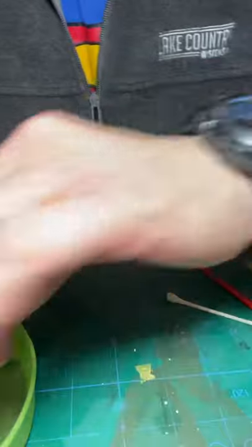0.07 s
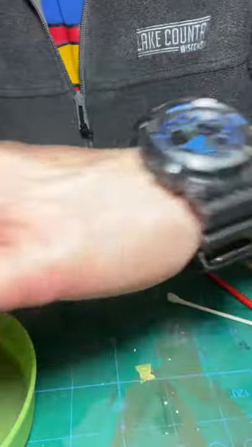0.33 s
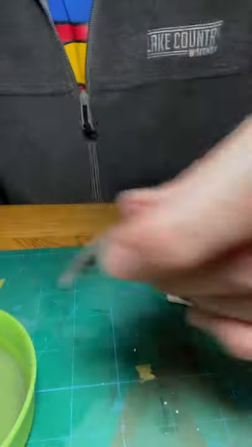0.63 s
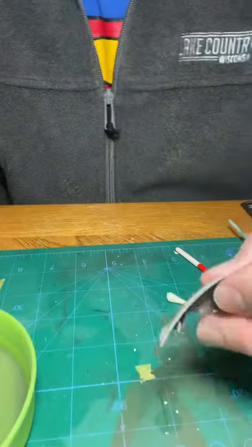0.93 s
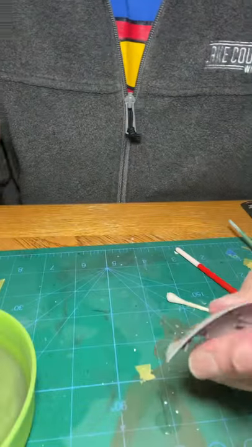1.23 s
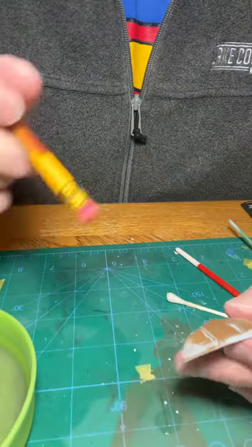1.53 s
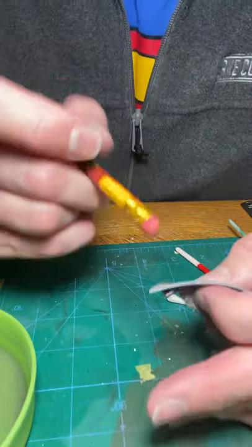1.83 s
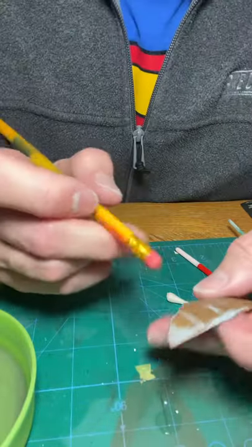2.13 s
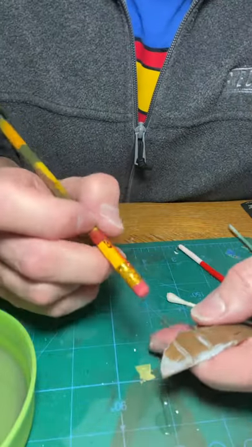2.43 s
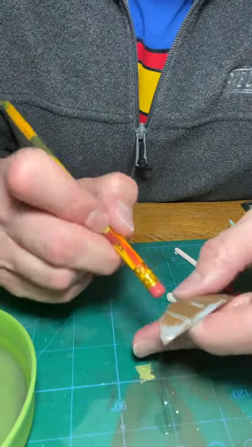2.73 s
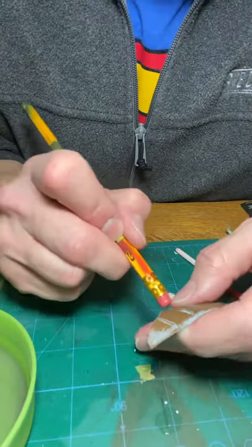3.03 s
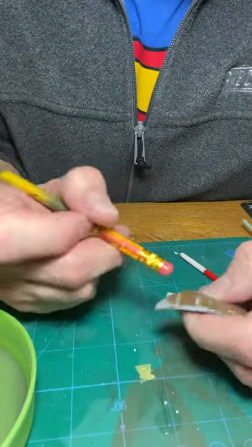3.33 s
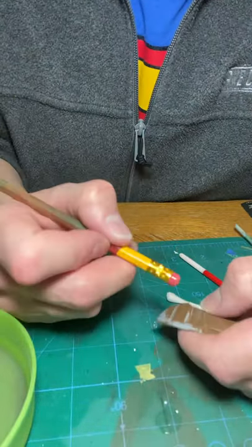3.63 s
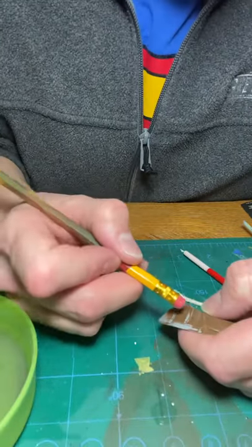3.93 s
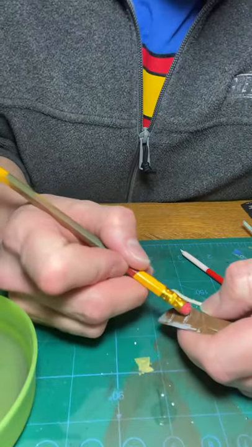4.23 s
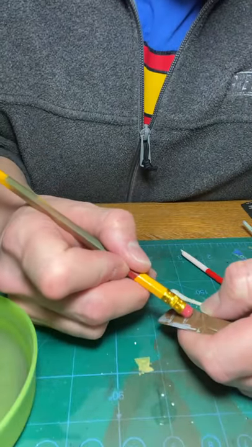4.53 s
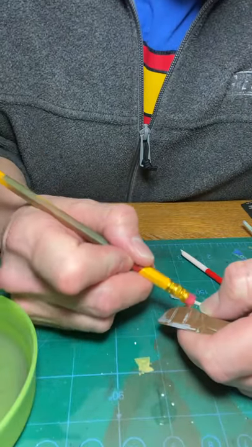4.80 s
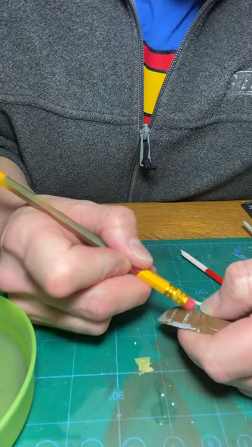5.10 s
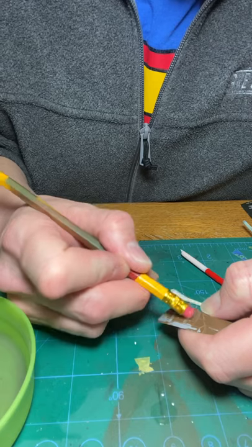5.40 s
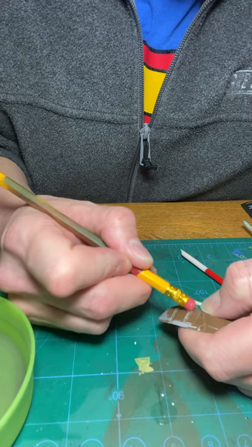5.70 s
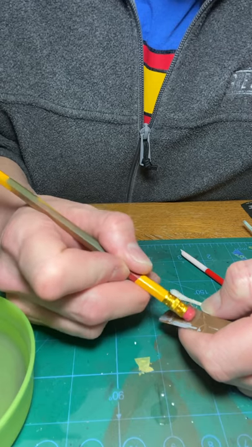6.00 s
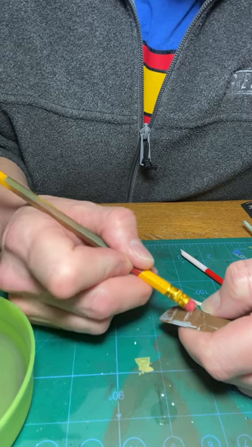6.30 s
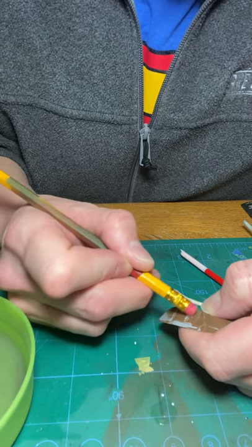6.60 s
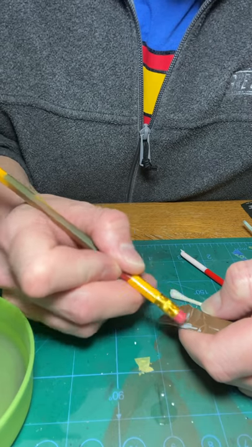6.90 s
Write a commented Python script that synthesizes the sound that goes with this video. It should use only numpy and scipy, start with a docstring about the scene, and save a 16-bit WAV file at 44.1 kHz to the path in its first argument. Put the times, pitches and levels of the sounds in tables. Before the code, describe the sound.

Hands bump and scuff a table with small plastic clicks and sleeve rustle, then a pencil eraser faintly rubs a plastic part.

```python
"""A work table in a quiet, humming room, heard close from a stereo microphone pair standing on the table.
Someone takes up a small painted plastic part and a pencil: fleece sleeves swish, hands bump the top
and skid on the mat, small things click, knock and scrape. Then light, quick eraser strokes rub the part.
Rustle and rubbing cross the air to the microphones; every bump comes through the table and booms."""
import sys
import numpy as np
from scipy import signal
from scipy.fft import rfft, irfft
from scipy.io import wavfile

SR = 44100
rng = np.random.default_rng(int(sys.argv[2]) if len(sys.argv) > 2 else 0)


def put_to_file(sound):
    """Save the sound as 16-bit audio at rate SR, in the file named by the first command-line argument."""
    columns = np.atleast_2d(sound).T  # one column per channel
    safe = np.clip(columns, -1, 1)
    whole_steps = np.round(safe * 32767)
    wavfile.write(sys.argv[1], SR, whole_steps.astype(np.int16))


N = 306493
TIME = np.arange(N) / SR
BIN_HZ = np.fft.rfftfreq(N, 1 / SR)


def gain_of(db):
    """Decibels to amplitude."""
    return 10 ** (np.asarray(db) / 20)


def unit_rms(x):
    """Scales to rms 1."""
    return x / np.sqrt(np.mean(x ** 2) + 1e-30)


def curve_at(points, hz, column=1):
    """One column of a table, interpolated along log frequency."""
    table = np.array(points, float)
    return np.interp(np.log(hz + 1), np.log(table[:, 0] + 1), table[:, column])


def add(mix, start_s, sound):
    """Adds a sound to the mix at start_s."""
    part = mix[max(round(start_s * SR), 0):][:len(sound)]
    part += sound[:len(part)]


def coloured(x, spectrum, centre_hz=1000, focus_db=0, focus_octaves=0.11):
    """Gives x a spectrum, lifted around centre_hz; rms 1."""
    hz = np.fft.rfftfreq(len(x), 1 / SR)
    lift_db = focus_db * np.exp(-(np.log2((hz + 1) / centre_hz) / focus_octaves) ** 2)
    return unit_rms(irfft(rfft(x) * gain_of(curve_at(spectrum, hz) + lift_db), len(x)))


def drift(rate_hz):
    """A smooth random wander of rms 1."""
    return unit_rms(irfft(rfft(rng.standard_normal(N)) * np.exp(-(BIN_HZ / rate_hz) ** 2), N))


def grains(per_s, spread_db):
    """Friction: a crowd of tiny catches, a few of them large."""
    size = gain_of(spread_db * np.minimum(rng.exponential(1, N), 5))
    return unit_rms(size * rng.standard_normal(N) * (rng.random(N) < per_s / SR))


def patchy(x, depth_db, width_bins=6.0, length_frames=46.0):
    """Shifts the colour of a noise by chance, as when a rubbing contact moves; rms 1."""
    frames = signal.stft(x, nperseg=256, noverlap=192)[2]
    steps = np.arange(-40, 41)
    across, along = (np.exp(-.5 * (steps / spread) ** 2) for spread in (width_bins / 2, length_frames))
    patches = signal.fftconvolve(rng.standard_normal(frames.shape), np.outer(across, along), "same")
    frames *= gain_of(depth_db * unit_rms(patches))
    return unit_rms(signal.istft(frames, nperseg=256, noverlap=192)[1][:N])


def ringing(modes, t, weights=1):
    """Dying modes, each starting at a random phase."""
    hz, db, t60 = np.transpose(modes)
    turns = hz * t[:, None] + rng.random(len(hz))
    waves = gain_of(db - 60 * t[:, None] / t60) * np.sin(2 * np.pi * turns)
    return (waves * weights).sum(1)


def resonant(x, peaks, plain=0):
    """Passes x through resonances, beside a plain share; rms 1."""
    response = plain + sum(gain_of(db) / (1 + 2j * (BIN_HZ - hz) / width) for hz, width, db in peaks)
    return unit_rms(irfft(rfft(x) * response, N))


# Paths to the microphones: across the air, through the table under them, off the mat in front of them
# (f/Hz, lead of the left side/rad, level of the right side/dB)
AIR_PATH = [(60, 0, -1), (140, 0, 2), (230, -.8, 4), (370, -2.4, 1.5), (600, -3.6, .5), (1300, -3.3, 0),
            (3500, -3.45, 0), (4300, -5.1, -1), (5200, -6.2, -1), (7500, -6.3, -1), (10000, -7.7, 0),
            (12700, -9.2, 0)]
TABLE_PATH = [(60, .1, -3), (130, .3, -9), (220, 1.3, -7), (350, 2.4, -2), (650, 2.5, 0), (1300, 2.9, 0)]
MAT_PATH = [(200, -.8, 2), (480, -2.5, 0), (700, -1.9, 0), (1240, -1.9, 0), (1950, -2.8, 0),
            (2700, -3.8, 0), (4300, -4.9, -1), (5200, -6.2, -1), (7500, -6.3, -1), (12700, -9.2, 0)]
def microphone_pair(x, path, fade_s=0.005):
    """Left and right as the microphones hear x along a path, faded at both ends."""
    left = x * np.minimum(np.minimum(TIME, TIME[::-1]) / fade_s, 1)
    right_gain = gain_of(curve_at(path, BIN_HZ, column=2))
    right_lag = np.exp(-1j * curve_at(path, BIN_HZ))
    return np.array([left, irfft(rfft(left) * right_gain * right_lag, N)])


# Room air all around the table (f/Hz, level/dB per Hz)
AIR_SPECTRUM = [(20, -36), (50, 4.5), (90, -8), (200, -8.5), (330, -12), (450, -15.5), (900, -26.5),
                (1800, -37.5), (2600, -45.5), (4000, -46.5), (6500, -51.5), (10000, -56.5), (12300, -54),
                (13000, -64.5), (15000, -67.5)]
# An appliance in the background (f/Hz, level/dB, level of the right side/dB, lead of the left side/rad)
APPLIANCE_HUM = [(59.74, -58.5, 0, 1), (140, -68.5, 2.5, 1.5), (360.5, -65.5, 2, -2), (591.4, -79, 1, 4.5),
                 (952, -88.5, -2.5, 5.5)]
def room_tone(air_db=-55, diffuse_db=-64, waver=0.23):
    """Air noise, partly from one side and partly diffuse, and an appliance's slightly wavering hum."""
    air = patchy(coloured(rng.standard_normal(N), AIR_SPECTRUM), depth_db=-0.4, width_bins=6.4)
    out = gain_of(air_db) * microphone_pair(air, AIR_PATH)
    diffuse = np.array([coloured(side, AIR_SPECTRUM) for side in rng.standard_normal((2, N))])
    out += gain_of(diffuse_db) * diffuse
    for hz, db, right_db, lead in APPLIANCE_HUM:
        phase = 2 * np.pi * hz * TIME + 2 * waver * drift(rate_hz=1.8)
        pair = np.array([np.sin(phase), gain_of(right_db) * np.sin(phase - lead)])
        out += np.sqrt(2) * gain_of(db) * (1 + waver * drift(rate_hz=36.0)) * pair
    return out


# Modes of the table top, right under the microphones (f/Hz, level/dB, t60/s)
TABLE_MODES = [(49, -23.5, 0.25), (59.6, -3.5, 0.3), (85.4, -2, 0.45), (126.3, 0, 0.23), (138.04, -8, 0.74),
               (161.8, 1.5, 0.12), (197, -6, 0.28), (201.6, 5, 0.078), (238.8, -2, 0.16),
               (278.3, -8, 0.079), (337.8, -5, 0.17), (483.5, -9.5, 0.15), (678, -15, 0.11),
               (700, -17.5, 0.029)]
def table_top(force, damping):
    """The top rings in answer to a force; damping above 1 shortens the ring, as a hand on it does."""
    t = TIME[:SR // 2]
    response = sum((-1) ** k * gain_of(db - 60 * t * damping / t60) * np.sin(2 * np.pi * hz * t)
                   for k, (hz, db, t60) in enumerate(TABLE_MODES))
    return signal.fftconvolve(force, response)[:N]


# Rumble of hands resting on the same table as the microphones (t/s, level/dB before contrast)
HAND_WEIGHT = [(0.0, -44), (0.87, -55.5), (1.6, -61.5), (1.8, -47.5), (2.15, -50), (2.92, -45),
               (3.08, -47.5), (3.58, -47.5), (3.72, -35.5), (3.87, -50), (4.82, -58), (4.95, -49.5),
               (5.87, -60.5), (6.15, -50), (6.44, -59), (6.95, -47.5)]
def leaning_hands(contrast=1.37, usual_db=-48):
    """Resting hands shift and nudge the table at random, the more so the harder they lean."""
    nudge_spectrum = [(20, -6), (50, 3), (100, 4), (200, -0.5), (400, 1), (800, -11.5)]
    force = coloured(grains(per_s=160, spread_db=2.0), nudge_spectrum)
    weight_db = np.interp(TIME, *np.transpose(HAND_WEIGHT))
    rumble = unit_rms(table_top(force, damping=0.89))
    return rumble * gain_of(usual_db + contrast * (weight_db - usual_db))


# Modes of the part and the fingers holding it over the mat (f/Hz, level/dB, t60/s)
HELD_MODES = [(354, 1.5, 0.098), (455, -6, 0.14), (483, 4.5, 0.071), (626, -4, 0.09), (740, -19, 0.088),
              (1015, -10, 0.067), (1220, 3, 0.077), (1397, 2.5, 0.038), (1655, 5.5, 0.03),
              (1901, 3.5, 0.045), (2390, -6, 0.012)]
def fidgeting_fingers(level_db=-77, restless_db=7):
    """Fingertips keep creeping on the part: faint, irregular little rubs."""
    creep_spectrum = [(200, -10), (450, -1.5), (1300, -3.5), (2300, -17), (4000, -33)]
    force = coloured(grains(per_s=170, spread_db=1.5), creep_spectrum)
    force *= gain_of(restless_db * np.tanh(drift(rate_hz=26)))
    rubs = signal.fftconvolve(force, ringing(HELD_MODES, TIME[:SR // 8]))[:N]
    return gain_of(level_db) * unit_rms(rubs)


# Hands and forearms land on the table and boom up into the microphones
# (t/s, level/dB, f/Hz driven most, heft in the lowest modes/dB)
ARM_BUMPS = [(0.002, -42.5, 143, -12), (0.598, -40, 165, -14), (1.069, -34, 247, -19),
             (1.084, -34.5, 237, -12.5), (1.166, -47, 67, -12), (1.587, -40, 154, -12),
             (1.896, -41, 56.4, -20), (1.933, -39.5, 62, -10), (1.944, -45, 216, -34),
             (3.309, -34, 168, -8), (3.359, -35, 179, -5), (3.385, -35.5, 123, -16),
             (3.549, -32, 108.5, -14), (3.578, -41, 104, -26), (4.057, -39, 135, -3.5),
             (4.847, -34.5, 166, -24), (5.117, -41.5, 222, -34), (5.516, -45, 182, -14),
             (6.175, -40.5, 117, -9), (6.859, -43.5, 174, -22)]
def arm_bumps(reach_octaves=0.56, rise_s=0.0032):
    """Soft flesh drives the table modes near one pitch, and a heavy arm the lowest ones too."""
    out, t = np.zeros(N), TIME[:SR // 2]
    mode_hz = np.array(TABLE_MODES)[:, 0]
    for start_s, db, hz, heft_db in ARM_BUMPS:
        near_pitch = 1 / (1 + (np.log2(mode_hz / hz) / reach_octaves) ** 2)
        heft = gain_of(heft_db) * (mode_hz < 100)
        boom = ringing(TABLE_MODES, t, near_pitch + heft) * (1 - np.exp(-(t / rise_s) ** 2))
        add(out, start_s, gain_of(db) * boom / boom[:SR // 20].std())
    return out


# Modes of the plastic part (f/Hz, level/dB, t60/s)
PLASTIC_MODES = [(738, 5, 0.16), (1156, 2, 0.036), (2010, -24, 0.03), (4400, -6, 0.03),
                 (5780, -22.5, 0.025), (6600, -0.5, 0.012)]
# Pencil, fingernails and part click just in front of the microphones
# (t/s, level/dB, centre f/Hz, span to either side/octaves, crack decay/s, ring/dB)
SMALL_CLICKS = [(0.236, -71, 6900, 0.28, 0.002, -30), (0.4742, -54, 7340, 1.6, 0.0016, -28),
                (0.7733, -66, 5400, 0.2, 0.0017, -30), (1.064, -54, 4160, 0.41, 0.0012, -26),
                (2, -51, 5640, 0.69, 0.0039, -42), (2.1161, -59, 6950, 0.35, 0.0009, -26),
                (2.152, -59.5, 6700, 0.59, 0.002, -34), (2.7736, -77, 6100, 0.26, 0.0027, -27),
                (3.003, -58.5, 5500, 0.4, 0.0037, -13), (3.088, -60, 5100, 0.37, 0.0019, -26),
                (3.159, -57.5, 7140, 0.43, .0012, -16), (3.2969, -48, 3400, 0.95, 0.0014, -8),
                (3.5677, -49, 5300, 0.48, 0.0032, 3.5), (3.6624, -51, 3260, 1.02, 0.003, -29),
                (3.7, -54.5, 5040, 0.43, .006, -23), (4.844, -78, 5000, 0.64, .003, -21)]
def small_clicks(rise_s=0.00054, snap_db=-13, snap_decay_s=0.0012):
    """A short crack, thin or full by what touches, with a bright snap on top; then the plastic rings."""
    out, t = np.zeros(N), TIME[:SR // 8]
    bright = signal.butter(2, 9000, "highpass", fs=SR)
    rise = 1 - np.exp(-t / rise_s)
    for start_s, db, hz, octaves, crack_s, ring_db in SMALL_CLICKS:
        band = signal.butter(2, [hz / 2 ** octaves, min(hz * 2 ** octaves, 12000)], "bandpass", fs=SR)
        crack = signal.lfilter(*band, rng.standard_normal(len(t)) * np.exp(-t / crack_s) * rise)
        crack /= crack[:SR // 170].std()
        snap = signal.lfilter(*bright, rng.standard_normal(len(t)) * np.exp(-t / snap_decay_s))
        ring = rise * ringing(PLASTIC_MODES, t)
        add(out, start_s, gain_of(db) * (crack + gain_of(snap_db) * snap + gain_of(ring_db) * ring))
    return out


# Hiss of fleece at close range (f/Hz, level/dB per Hz)
FLEECE_SPECTRUM = [(200, -7), (500, 6.5), (1100, 16), (2000, 10), (2800, -4), (4200, 2), (5500, 4.5),
                   (7000, 3.5), (8500, -10), (10500, -12.5), (12200, -15.5), (13200, -23), (15000, -40)]
# Sleeves slide near the microphones (t/s, length/s, level/dB before trim, sheen/dB before lift)
SLEEVE_SLIDES = [(0.41, 0.22, -67, -4), (0.592, 0.2, -62, -8.5), (0.818, 0.29, -68.5, -10.5),
                 (1.218, 0.16, -69.5, 0), (1.338, 0.19, -68.5, 8.5), (1.45, 0.42, -65.5, 1),
                 (1.86, 0.05, -61.5, -8), (1.958, 0.0098, -54, -1.5), (2.082, 0.078, -65, -1),
                 (2.216, 0.49, -72, -6), (2.489, 0.17, -62.5, -7.5), (3.117, 0.43, -62, 2.5),
                 (3.703, 0.084, -57.5, -25)]
def sleeves(trim_db=-2, flutter_db=0.93, sheen_lift_db=10, crinkle_db=-8, attack_s=0.069, fall_s=0.035):
    """Slides swell, hold and fade as fibres catch and let go; some are bright with sheen, others dull."""
    fibres = rng.standard_normal(N) + gain_of(crinkle_db) * grains(per_s=900, spread_db=2.6)
    hiss = patchy(coloured(fibres, FLEECE_SPECTRUM), depth_db=2.8, length_frames=12.0)
    treble = signal.sosfiltfilt(signal.butter(3, 8200, "highpass", fs=SR, output="sos"), hiss)
    speed, sheen = np.zeros(N), np.zeros(N)
    for start_s, length_s, db, sheen_db in SLEEVE_SLIDES:
        t = TIME - start_s
        slide = gain_of(db) * np.exp(np.minimum(t / attack_s, 0) - np.maximum((t - length_s) / fall_s, 0))
        speed = np.maximum(speed, slide)
        sheen = np.maximum(sheen, slide * gain_of(sheen_db + sheen_lift_db))
    flutter = gain_of(trim_db + flutter_db * drift(rate_hz=360))
    return flutter * (speed * (hiss - treble) + sheen * treble)


# Bands in the hiss of an arm passing the microphones
# (f/Hz, width/Hz, level/dB, loudest at t/s, half-length/s, rise/octaves per s)
SWEEP_BANDS = [(2315, 190, -61, 0.685, 0.064, 0.1), (3770, 300, -67.5, 0.68, 0.079, 0.7),
               (5020, 230, -73, 0.73, 0.05, 0.17), (6100, 500, -72.5, 0.7, 0.037, .3),
               (5120, 320, -72.5, 0.885, 0.033, 0.11), (7350, 1100, -70.5, .42, 0.014, .5),
               (6700, 760, -74.5, 1.48, 0.076, 0.296)]
def sleeve_whistle():
    """As an arm sweeps past, its hiss rings in a few narrow bands that rise a little."""
    out, t = np.zeros(N), TIME[:SR * 3 // 4] - 3 / 8
    for hz, width, db, peak_s, half_s, rise in SWEEP_BANDS:
        narrow = signal.butter(2, width / 2, fs=SR, output="sos")
        cos_noise, sin_noise = signal.sosfilt(narrow, rng.standard_normal((2, len(t))))
        phase = 2 * np.pi * np.cumsum(hz * 2 ** (rise * t)) / SR
        band = unit_rms(cos_noise * np.cos(phase) + sin_noise * np.sin(phase))
        add(out, peak_s + t[0], gain_of(db) * band * np.exp(-.5 * (t / half_s) ** 2))
    return out


# The puff of friction in a knock (f/Hz, level/dB per Hz)
PUFF_SPECTRUM = [(250, -20.5), (450, 15.5), (2000, -7.5), (2900, -12), (6000, -34.5)]
# Part, pencil and eraser knock in the fingers, over the mat (t/s, level/dB, f/Hz driven most)
DULL_KNOCKS = [(1.066, -68, 1430), (1.073, -51.5, 463), (1.586, -52.5, 450), (2.002, -63.5, 1740),
               (2.503, -52.5, 2050), (3.299, -49, 1860), (3.36, -47, 430), (3.571, -52, 745),
               (3.572, -58.5, 1250), (3.66, -55.5, 1620), (4.055, -50.5, 400), (4.057, -57.5, 640),
               (4.324, -59, 484), (4.849, -72, 1510)]
def dull_knocks(reach_octaves=0.17, puff_db=-7, puff_decay_s=0.011, rise_s=0.0017):
    """The held part rings briefly near one pitch, damped by the fingers, with a puff of friction."""
    out, t = np.zeros(N), TIME[:SR // 4]
    mode_hz = np.array(HELD_MODES)[:, 0]
    for start_s, db, hz in DULL_KNOCKS:
        near_pitch = 1 / (1 + (np.log2(mode_hz / hz) / reach_octaves) ** 2)
        ring = unit_rms(ringing(HELD_MODES, t, near_pitch))
        noise = coloured(rng.standard_normal(len(t)), PUFF_SPECTRUM, hz, focus_db=13, focus_octaves=0.34)
        puff = unit_rms(noise * np.exp(-t / puff_decay_s))
        knock = (ring + gain_of(puff_db) * puff) * (1 - np.exp(-t / rise_s))
        add(out, start_s, gain_of(db) * knock / knock[:SR // 33].std())
    return out


# Rubber and fingertips chirp and creak close by (t/s, level/dB, half-length/s, f/Hz)
PAINT_SQUEAKS = [(1.79, -52.5, 0.1, 467), (2.945, -41.5, 0.006, 456), (3.733, -45.5, 0.014, 693),
                 (4.326, -46, 0.0064, 457), (5.341, -73.5, 0.011, 3810), (5.346, -47.5, 0.0062, 513),
                 (6.175, -43.5, 0.005, 470)]
def paint_squeaks(width_share=0.055):
    """Fast stick-slip on the paint gives brief, fuzzy tones."""
    out, t = np.zeros(N), TIME[:SR] - .5
    for peak_s, db, half_s, hz in PAINT_SQUEAKS:
        edges_hz = [hz * (1 - width_share), hz * (1 + width_share)]
        band = signal.butter(2, edges_hz, "bandpass", fs=SR, output="sos")
        tone = unit_rms(signal.sosfilt(band, rng.standard_normal(SR)))
        add(out, peak_s + t[0], gain_of(db) * tone * np.exp(-.5 * (t / half_s) ** 2))
    return out


# Skin dragging on the mat (f/Hz, level/dB per Hz)
GRIT_SPECTRUM = [(200, -21), (400, 0), (700, -5.5), (950, -5), (1600, -1.5), (2200, -13), (2900, -28),
                 (3700, -15.5), (6500, -32.5), (9000, -29), (12000, -34), (14500, -90)]
# Resonances that the dragging hand wakes (f/Hz, width/Hz, level/dB)
RASP_PEAKS = [(297, 20, 13), (498, 52, 6), (696, 9.8, 5.5), (1265, 36, -5.5), (1977, 78, -0.5),
              (2185, 55, -2.5)]
# A hand skids in front of the microphones (t/s, half-length/s, slip rate/Hz, judder/dB, grit/dB)
HAND_SCUFFS = [(2.391, 0.03, 200, -47, -58), (2.51, 0.0056, 223, -31.5, -52),
               (2.985, 0.13, 193, -47, -63.5), (3.023, 0.013, 189.4, -21.5, -54),
               (3.705, 0.012, 170, -28.5, -45), (3.737, 0.016, 205, -19.5, -40.5),
               (3.787, 0.031, 227, -33.5, -49.5)]
def hand_scuffs(jitter=0.06, squareness=2.4):
    """Skin sticks and slips: each slip kicks the table and sheds a puff of grit; returns the two apart."""
    judder, grit_level = np.zeros(N), np.zeros(N)
    unsteady, catches = drift(rate_hz=300), grains(per_s=3500, spread_db=2.4)
    t = TIME[:SR] - .5
    low_cut = signal.butter(2, 100, "highpass", fs=SR)
    for peak_s, half_s, slip_hz, judder_db, grit_db in HAND_SCUFFS:
        pressure = np.exp(-.5 * abs(t / half_s) ** squareness)
        slips = np.cumsum(slip_hz * (1 + jitter * unsteady[round(peak_s * SR):][:SR])) / SR
        kicks = np.diff(np.floor(slips), prepend=0) * pressure
        shake = signal.lfilter(*low_cut, table_top(kicks, damping=1.28))
        add(judder, peak_s + t[0], gain_of(judder_db) * shake / (abs(shake).max() + 1e-12))
        puffs = unit_rms(1 + np.exp(-(slips % 1)))
        add(grit_level, peak_s + t[0], gain_of(grit_db) * pressure * puffs)
    return judder, grit_level * resonant(coloured(catches, GRIT_SPECTRUM), RASP_PEAKS, plain=0.27)


# Resonances of the gripped part (f/Hz, width/Hz, level/dB)
GRIP_PEAKS = [(798, 34, -5), (1246, 39, 7.5), (1290, 17, -25), (1944, 37, -1.5), (2820, 45, -23),
              (3450, 52, -30), (4190, 144, -7), (5100, 300, -19.5), (5840, 740, -14.5), (6440, 230, -28)]
# The part scrapes as it is gripped, over the mat (t/s, length/s, level/dB, extra treble/dB)
GRIP_SCRAPES = [(2.493, 0.016, -55, -2), (2.496, 0.014, -47, -16), (2.966, 0.043, -56, -8),
                (3.012, 0.028, -46, -4.5)]
def grip_scrapes(swell_db=5, fine_db=-3, treble_hz=4000):
    """Gritty catches ring the plastic, harder and harder until the grip holds and they stop at once."""
    out = np.zeros(N)
    catches = grains(per_s=700, spread_db=1.5) + gain_of(fine_db) * rng.standard_normal(N)
    for start_s, length_s, db, treble_db in GRIP_SCRAPES:
        progress = (TIME - start_s) / length_s
        force = catches * (progress >= 0) * (progress < 1) * gain_of(swell_db * np.clip(progress, 0, 1))
        peaks = [(hz, width, peak_db + treble_db * (hz > treble_hz)) for hz, width, peak_db in GRIP_PEAKS]
        out += gain_of(db) * resonant(force, peaks) * np.sqrt(length_s * SR / N)
    return signal.sosfilt(signal.butter(6, 7500, fs=SR, output="sos"), out)


# Hiss of rubber on paint (f/Hz, level/dB per Hz)
RUBBER_SPECTRUM = [(1500, -39.5), (3000, -4), (4100, 2), (5000, -1), (6300, 1), (7400, -1), (8300, -1.5),
                   (10300, -16), (11600, -3.5), (12800, -30.5)]
# Resonances of the rubbed part (f/Hz, width/Hz, level/dB)
RUBBED_PEAKS = [(5240, 160, -8), (6180, 310, -8.5), (6460, 190, -7.5)]
# Bouts of eraser strokes, faint even this close (middle t/s, level/dB before trim, brightest f/Hz)
ERASER_STROKES = [(4.324, -82, 6050), (4.413, -73, 6700), (4.516, -73.5, 5460), (4.613, -74.5, 6400),
                  (4.727, -72, 5500), (4.98, -77.5, 5400), (5.085, -73, 6600), (5.194, -72, 5600),
                  (5.302, -72.5, 6600), (5.4, -73, 5340), (5.496, -75, 6900), (5.616, -73, 5260),
                  (5.717, -81, 6900), (5.827, -71.5, 5000), (5.929, -72, 6900), (6.038, -70.5, 5340),
                  (6.137, -73.5, 7100), (6.249, -71.5, 5600), (6.357, -74.5, 7400), (6.606, -78, 6960),
                  (6.714, -77.5, 5200), (6.82, -71.5, 6840), (6.932, -68.5, 7700)]
def eraser(trim_db=-1, usual_half_s=0.014, usual_hz=6100, stretch=0.56, squareness=2.1):
    """Strokes swell and fade with their speed; one way is short and low, the other longer and higher."""
    out, t = np.zeros(N + SR), TIME[:SR // 5] - .1
    friction = resonant(grains(per_s=3000, spread_db=0.6), RUBBED_PEAKS, plain=0.87)
    friction = patchy(friction, depth_db=2.2, length_frames=7.3)
    for middle_s, db, hz in ERASER_STROKES:
        half_s = usual_half_s * (hz / usual_hz) ** stretch
        speed = np.exp(-.5 * abs(t / half_s) ** squareness)
        contact = np.roll(friction, -round(middle_s * SR))[:len(t)]
        rub = coloured(contact, RUBBER_SPECTRUM, hz, focus_db=7.5, focus_octaves=0.22)
        stroke = unit_rms(rub * speed) * np.sqrt(np.mean(speed ** 2))
        add(out, middle_s + t[0], gain_of(db + trim_db) * stroke)
    return out[:N]


def small_room(pair, wet_db, t60_s):
    """Adds the short tail of a small room, different at each microphone."""
    t = TIME[:SR // 2]
    tails = rng.standard_normal((2, len(t))) * gain_of(-60 * t / t60_s) * (t > .003)
    tails /= np.linalg.norm(tails, axis=1, keepdims=True)
    return pair + gain_of(wet_db) * signal.fftconvolve(pair, tails, axes=1)[:, :N]


def scene():
    """Rubbing and rustle arrive through the air, scrapes and clicks off the mat, bumps through the table."""
    judder, grit = hand_scuffs()
    in_air = eraser() + paint_squeaks() + sleeves() + sleeve_whistle()
    on_mat = small_clicks() + dull_knocks() + fidgeting_fingers() + grip_scrapes() + grit
    in_table = arm_bumps() + judder + leaning_hands()
    close = microphone_pair(in_air, AIR_PATH) + microphone_pair(on_mat, MAT_PATH)
    booming = small_room(microphone_pair(in_table, TABLE_PATH), wet_db=-8.5, t60_s=0.25)
    return small_room(close, wet_db=-8.0, t60_s=0.13) + booming + room_tone()


def record(dry):
    """The recorder cuts off steeply at 15.9 kHz."""
    band_limit = signal.firwin(511, 15900, window=("kaiser", 9), fs=SR)
    return signal.oaconvolve(dry, band_limit[None], "same")


dry = scene()
out = record(dry)
put_to_file(out)
```